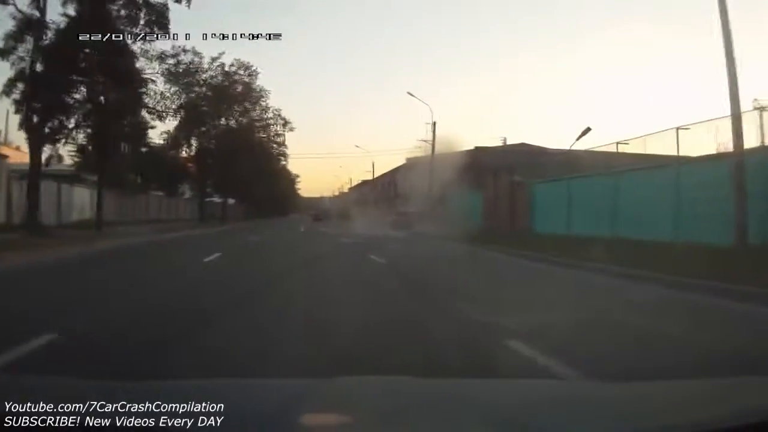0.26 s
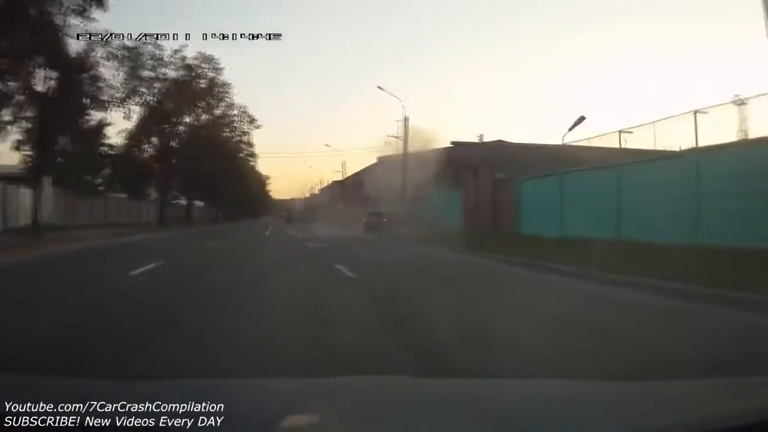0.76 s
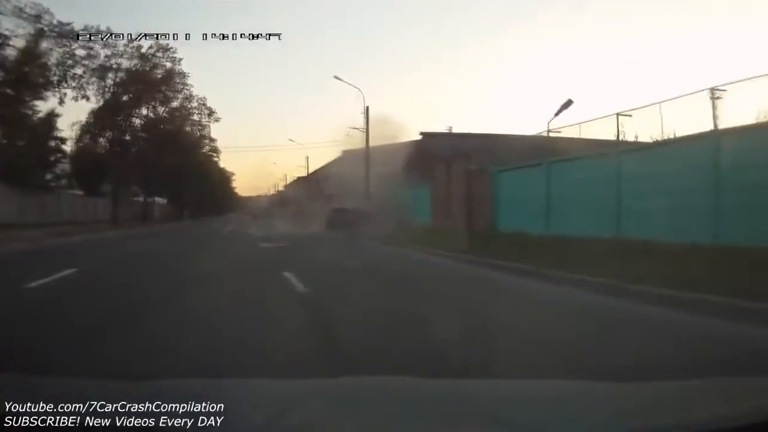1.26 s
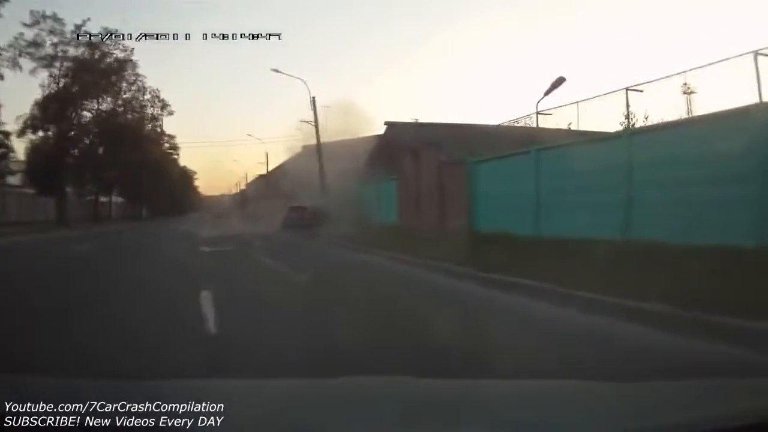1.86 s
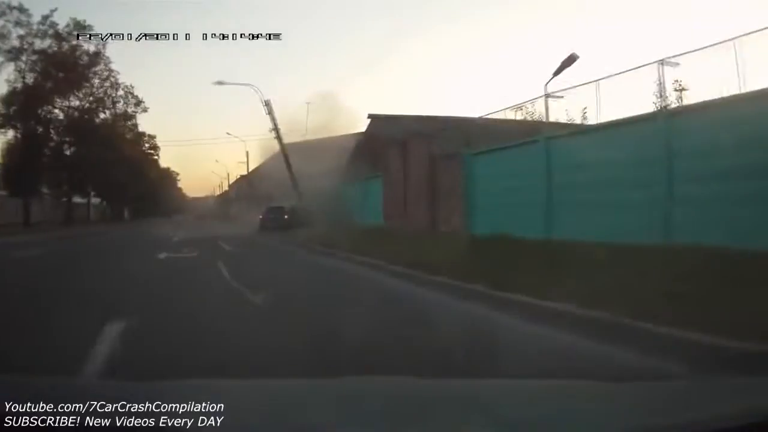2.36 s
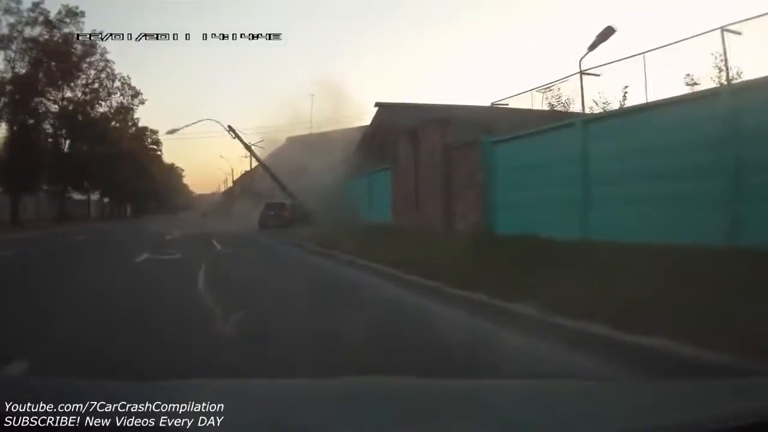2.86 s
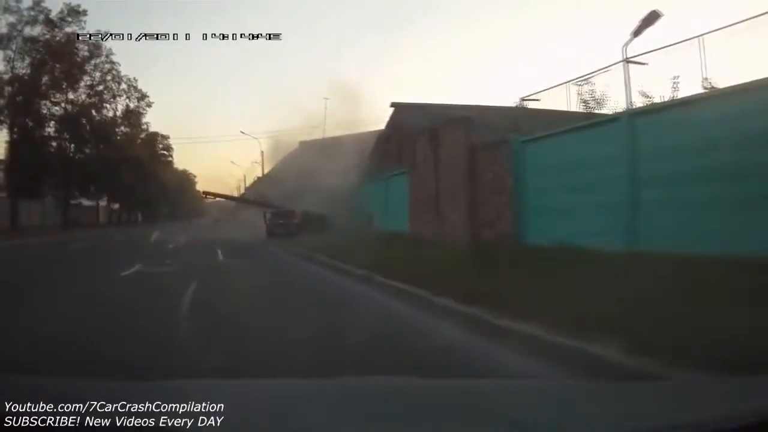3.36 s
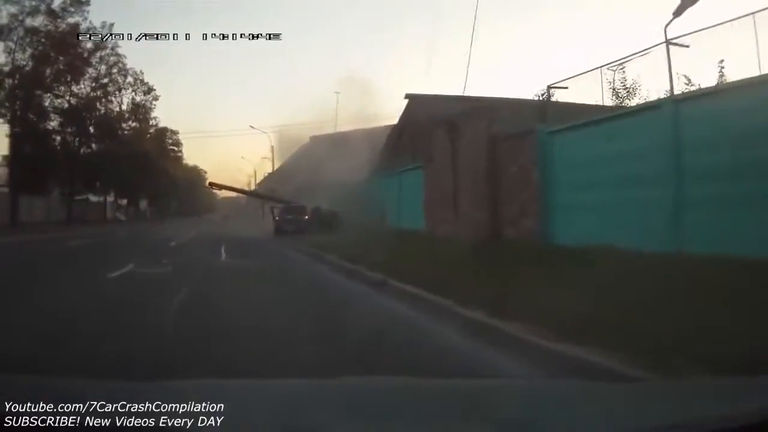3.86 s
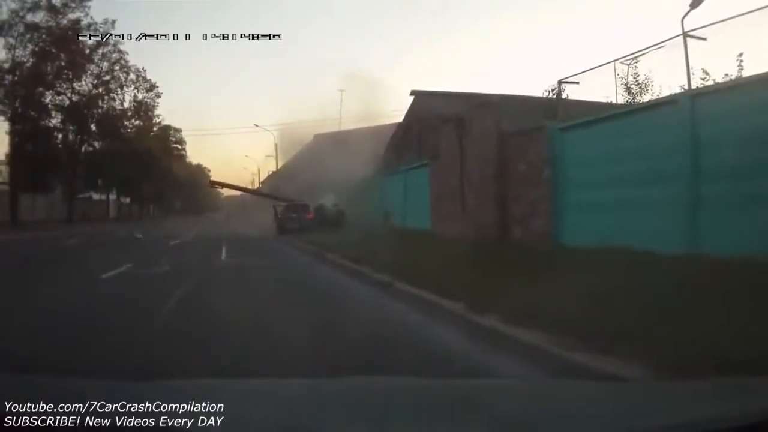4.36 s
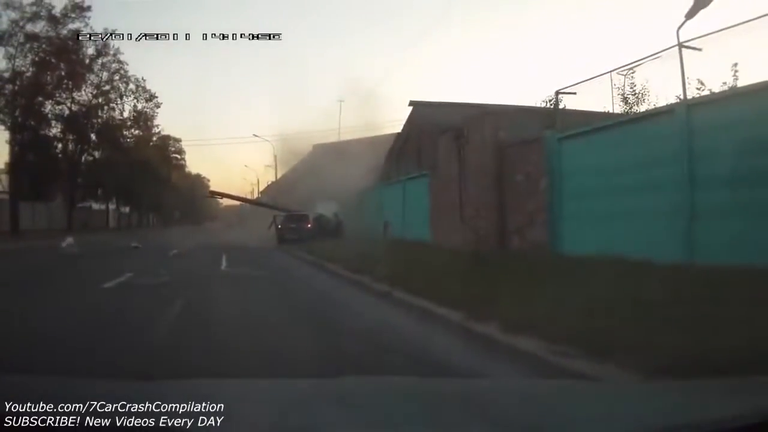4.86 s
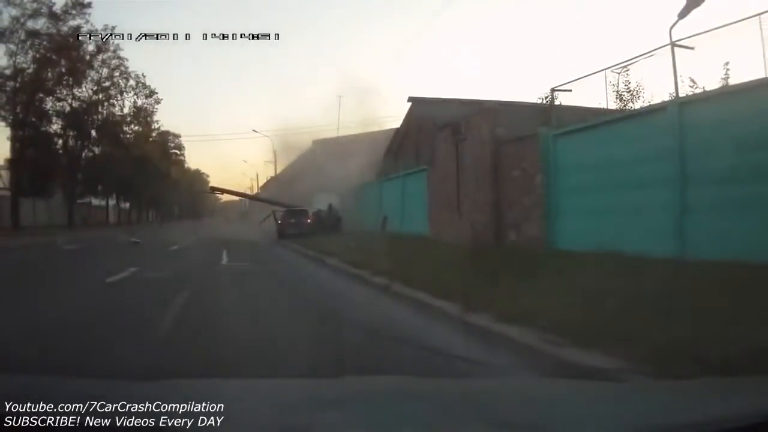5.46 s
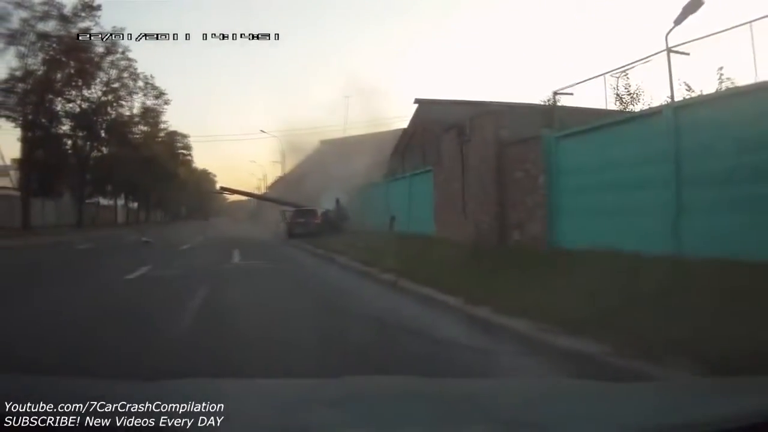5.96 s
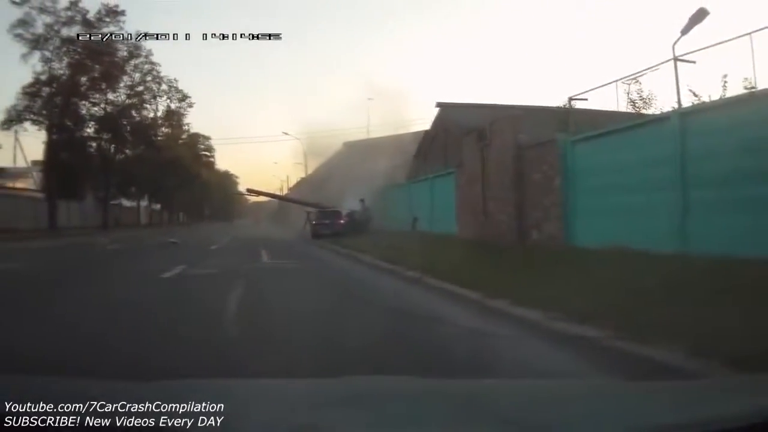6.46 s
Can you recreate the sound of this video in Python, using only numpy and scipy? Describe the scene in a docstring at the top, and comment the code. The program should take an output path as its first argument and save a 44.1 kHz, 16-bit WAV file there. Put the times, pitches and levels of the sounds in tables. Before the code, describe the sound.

A turn signal clicks evenly over the muffled rumble of tyres and a blowing fan, heard from within a car. After one early jolt the car slows, and loose objects rustle, crunch and thump against the trim and dashboard, the hardest hits crackling with dry clicks. Near the end the engine rises in a deep drone, with a faint swish, while the signal keeps clicking.

```python
"""Inside a car on a town road, heard by a small camera on the windscreen. From the start the road
rumbles through the body, the fan blows and the flasher relay clicks. The car slows, jolted near 1 s.
From 3.5 s, as it brakes to a crawl, loose things slide, scrape and knock in the cabin; the loudest knocks
overload the camera with dry clicks. At 5 s the engine picks up, its firings booming in the cabin air;
a soft swish follows and the driver eases off at 6.2 s."""
import sys
import numpy as np
from scipy import signal
from scipy.fft import rfft, irfft
from scipy.io import wavfile

SR = 44100
rng = np.random.default_rng(int(sys.argv[2]) if len(sys.argv) > 2 else 0)


def dump(signal):
    """Clip the signal to [-1, 1] and save it as 16-bit WAV at the path in sys.argv[1]."""
    limited = np.clip(np.atleast_2d(signal).T, -1, 1)
    pcm = np.round(limited * 32767).astype(np.int16)
    wavfile.write(sys.argv[1], SR, pcm)


N = 295470
TIME = np.arange(N) / SR


def undb(db):
    """Decibels to gain."""
    return 10 ** (np.asarray(db) / 20)


def unit(x):
    """Scale to rms 1."""
    return x / np.sqrt(np.mean(x ** 2))


def curve(table):
    """A (t/s, value) table interpolated over the scene."""
    return np.interp(TIME, *np.transpose(table))


def colour(x, outline):
    """Filter by an (f/Hz, level/dB) outline, falling 60 dB/octave beyond its ends; rms 1."""
    hz, db = np.transpose(outline)
    octave = np.log2(np.maximum(np.fft.rfftfreq(len(x), 1 / SR), 1))
    knots = np.log2(hz)
    beyond = np.abs(octave - np.clip(octave, knots[0], knots[-1]))
    gain = undb(np.interp(octave, knots, db) - 60 * beyond)
    return unit(irfft(rfft(x) * gain, len(x)))


def noise(outline, samples=N):
    """Coloured noise, rms 1."""
    return colour(rng.standard_normal(samples), outline)


def walk(rate_hz):
    """Random drift, spread near 1."""
    knots = rng.standard_normal(1024)
    return 1.2 * np.interp(TIME * rate_hz, np.arange(len(knots)), knots)


def strike(t, rise_s, t60_s):
    """Linear rise from t = 0, then exponential decay."""
    return np.clip(t / rise_s, 0, 1) * np.exp(-np.log(1000) * np.maximum(t - rise_s, 0) / t60_s)


def add(out, at_s, sound):
    """Mix a sound in at a given time."""
    start = max(int(at_s * SR), 0)
    out[start:start + len(sound)] += sound[:max(N - start, 0)]


# car speed: t/s, speed/(m/s)
SPEED = [(0, 15.8), (2.2, 10), (3.4, 8.1), (3.9, 3), (4.45, 4), (5.2, 4.1), (6.7, 4.4)]
# suspension rumble from bumps and the braking lurch: t/s, level/dB, t60/s
BUMPS = [(.66, -18.5, 4.4), (1.7, -17, 7.2), (3.06, -23.5, 1.7), (3.55, -20, 0.96), (4.0, -20, 0.46),
         (4.585, -16, 0.78)]
# spectra of wheel rumble, panel drone and tyre throb: f/Hz, level/dB
WHEEL_COLOUR = [(17, -9), (22, -1), (26, 10), (31, 0.5), (40, 1), (50, 0.5), (61, -7.5), (70, -7), (80, -7),
                (95, -8.5), (115, -25)]
BODY_COLOUR = [(65, -19.5), (110, -3.5), (135, -0.5), (156, -10), (183, -5), (238, -3), (267, -4.5),
               (312, -14), (355, -9.5), (404, -16), (435, -16), (480, -27), (620, -43.5), (1060, -120)]
TYRE_COLOUR = [(52, -11), (61, -1), (70, -2), (80, -2.5), (92, -9)]


def road(cruise_m_s=13):
    """Uneven asphalt shakes wheels, panels and tyres, more with speed; bumps add swells of rumble."""
    doublings = np.log2(curve(SPEED) / cruise_m_s)
    rolling_power = undb(-23 + 5 * doublings) ** 2
    bump_power = sum((undb(db) * strike(TIME - s, 0.063, t60_s)) ** 2 for s, db, t60_s in BUMPS)
    wheels = noise(WHEEL_COLOUR) * np.sqrt(rolling_power + bump_power) * undb(walk(9))
    body = noise(BODY_COLOUR) * undb(-29.5 + 1.68 * doublings + 0.68 * walk(16))
    tyres = noise(TYRE_COLOUR) * undb(-28 + 8.5 * doublings + 2 * walk(7))
    return wheels + body + tyres


# engine firing rate: t/s, f/Hz
FIRING_RATE = [(5.05, 19.2), (5.3, 34), (5.42, 35.5), (5.52, 41.2), (5.72, 44.6), (6.03, 44.7), (6.2, 50),
               (6.42, 46.4), (6.7, 48)]


def engine(pickup_s=5.02, ease_s=6.2, ease_db_per_s=-2.5, cabin_hz=41, width_hz=5.3):
    """Slightly uneven firings boom, most at the cabin's resonance; clatter grows with the revs."""
    hz = curve(FIRING_RATE)
    phase = 2 * np.pi * np.cumsum(hz * (1 + 0.0084 * walk(20))) / SR
    orders = np.sin(phase) + undb(-15.5) * np.sin(2 * phase) + undb(-25.5) * np.sin(3 * phase)
    throttle = np.clip((TIME - pickup_s) / 0.19, 0, 1)
    resonance_db = 6 / (1 + (2 * (hz - cabin_hz) / width_hz) ** 2)
    ease_db = ease_db_per_s * np.maximum(TIME - ease_s, 0)
    boom = unit(orders) * undb(-26 + resonance_db + ease_db + walk(18))
    clatter = undb(-36) * noise(BODY_COLOUR) + undb(-51) * noise(VENT_COLOUR)
    return throttle * (boom + clatter * hz / cabin_hz)


# cabin knocks: t/s, level/dB, hardness/dB, body t60/s, thud/dB, mode tilt/(dB/octave)
KNOCKS = [(1.061, -12, -15.5, 0.086, -23, 0), (3.589, -26, -2.5, 0.32, -14, 9.5),
          (3.655, -34.5, 1.5, 0.13, -12, -1), (4.243, -14.5, -23, 0.059, 3.5, 8),
          (4.436, -28, -10, 0.26, 9.5, 6), (4.553, -24, -15.5, 0.23, -4, 3.5),
          (4.632, -17, -9.5, 0.086, -20, 1), (4.641, -12.5, -13, 0.1, -30, 7),
          (4.664, -16.5, -11, 0.12, -9, -6), (4.713, -12.5, -14, 0.1, -3.5, 2),
          (4.744, -17.5, -16.5, 0.26, -9, 3.5), (4.783, -22, -27, 0.31, -17, 8),
          (4.85, -20, -25, 0.11, -19, -7), (4.882, -26.5, -3.5, 0.16, -10, 0),
          (5.097, -23, -14, 0.1, -9, -4)]
# body modes and dashboard clatter spectrum: f/Hz, level/dB
BODY_MODES = [(112, -6.5), (131, -2.5), (192, 5.5), (222, 4.5), (255, 2), (303, -2.5), (352, -9),
              (398, -16)]
DASH_COLOUR = [(300, 12.5), (400, 2), (550, 0), (670, -7), (760, -10), (930, -7.5), (1100, -12),
               (1300, -20.5), (1600, -32), (2400, -42), (4000, -49.5), (8000, -45.5)]


def knocks(thud_hz=120):
    """Knocks ring the body's modes; hard ones clatter in the dashboard, heavy ones thud in the floor."""
    out, t = np.zeros(N), TIME[:SR]
    hz, db = np.transpose(BODY_MODES)
    for s, level_db, hard_db, t60_s, thud_db, tilt_db in KNOCKS:
        detuned_hz = hz * (1 + 0.028 * rng.standard_normal(len(hz)))
        gains = undb(db + tilt_db * np.log2(hz / hz[0]))
        body = unit(gains @ np.sin(2 * np.pi * np.outer(detuned_hz, t)))
        dash = undb(hard_db - 0.5) * noise(DASH_COLOUR, len(t)) * strike(t, 0.002, 1.5 * t60_s)
        thud = undb(thud_db) * np.sin(2 * np.pi * thud_hz * t)
        add(out, s, undb(level_db) * ((body + thud) * strike(t, 0.0042, t60_s) + dash))
    return out


# armature bounces after contact: t/s, frame clack/dB, spring snap/dB
BOUNCES = [(.0008, -4, -4), (.0029, -8, -2), (.006, -9, -9.5), (.0092, -9, -10.5)]
# contact crack spectrum: f/Hz, level/dB
CRACK_COLOUR = [(1400, 13), (3500, 4), (7500, -10), (9800, 0), (11500, -14), (14500, -11)]


def relay_click(modes, frame_top_hz=4200):
    """The armature bounces on its stop; each touch clacks the frame and snaps the metal spring."""
    t = TIME[:SR // 8]
    hz, db = np.transpose(modes)
    detune, spread_db = rng.standard_normal((2, len(hz)))
    phase = 2 * np.pi * (np.outer(hz * (1 + 0.00044 * detune), t) + rng.random((len(hz), 1)))
    partials = undb(db + spread_db)[:, None] * np.sin(phase)
    partials /= np.std(partials.sum(axis=0))
    frame = partials[hz < frame_top_hz].sum(axis=0)
    spring = partials[hz >= frame_top_hz].sum(axis=0)
    clack = sum(undb(clack_db) * strike(t - s, 0.0005, 0.007) for s, clack_db, _ in BOUNCES)
    snap = sum(undb(snap_db) * strike(t - s, 0.0005, 0.008) for s, _, snap_db in BOUNCES)
    frame_fade = undb(-5.5) * strike(t, 0.005, 0.075)
    spring_fade = undb(-6.5) * strike(t, 0.004, 0.06)
    crack = undb(-12) * noise(CRACK_COLOUR, len(t)) * snap
    scattered = undb(-6) * noise(modes, len(t)) * frame_fade  # off seats and trim
    return frame * (clack + frame_fade) + spring * (snap + spring_fade) + crack + scattered


# relay modes, pulled in and released: f/Hz, level/dB
TOCK_MODES = [(520, 8), (970, -0.5), (1150, 1), (1510.0, 0), (1820.0, -9), (2050.0, -13), (2680.0, -17),
              (3030.0, -12), (3290.0, -8), (3510.0, -5.5), (3810.0, -9), (4520.0, -10.5), (5040.0, -2.5),
              (5690.0, -13.5), (6250.0, -13), (6790.0, -13), (7130.0, -21.5), (7640.0, -11.5),
              (8990.0, -21.5), (9640.0, -28.5)]
TICK_MODES = [(900, -3), (1220, -1), (1520.0, -6), (1790.0, -11), (2030.0, -13.5), (2290.0, -10.5),
              (2680.0, -9.5), (3000.0, -7.5), (3280.0, -3.5), (3430, -5.5), (3600.0, -5.5), (3850.0, -2),
              (4300.0, -15.5), (4930.0, -10), (5630.0, -14), (5860.0, -17), (6140.0, -16.5), (6850.0, -12),
              (7110.0, -16), (7580.0, -13), (8950.0, -20)]


def flasher(first_s=0.0064, period_s=0.67059, lamp_on_s=0.3144):
    """The relay pulls in (tock) once a period and lets go (tick) after the lamp's on time."""
    out = np.zeros(N)
    for s in np.arange(first_s, N / SR, period_s):
        add(out, s, undb(-37.5) * relay_click(TOCK_MODES))
        add(out, s + lamp_on_s, undb(-41) * relay_click(TICK_MODES))
    return out


# blows on the dashboard: t/s, level/dB, t60/s
CLACKS = [(4.634, -34, .06), (4.646, -28, .06), (4.884, -33, 0.084)]
# dashboard panel modes: f/Hz, level/dB
PANEL_MODES = [(470, 0), (580, 0), (690, -0.5), (800, 3), (950, 4.5), (1090, -4), (1260, -14)]


def clacks():
    """Hard things strike the dashboard and ring its panel, a little differently each time."""
    out, t = np.zeros(N), TIME[:SR // 2]
    hz, db = np.transpose(PANEL_MODES)
    for s, level_db, t60_s in CLACKS:
        detuned_hz = hz * (1 + 0.033 * rng.standard_normal(len(hz)))
        phase = 2 * np.pi * (np.outer(detuned_hz, t) + rng.random((len(hz), 1)))
        panel = unit(undb(db) @ np.sin(phase))
        add(out, s, undb(level_db) * panel * strike(t, 0.0014, t60_s))
    return out


# overload clicks: t/s, level/dB
OVERLOAD_CLICKS = [(1.0668, -40.5), (4.632, -47), (4.647, -49), (4.67, -46), (4.717, -39)]
# overload click spectrum: f/Hz, level/dB
OVERLOAD_COLOUR = [(700, 6), (1500, 5), (2200, -10), (3000, -24), (4000, -16), (5000, -25), (8000, -33)]


def overload_clicks():
    """The camera's sound distorts with brief dry clicks, placed at the peaks of the loudest knocks."""
    envelope = sum(undb(db) * strike(TIME - s, 0.00077, 0.0051) for s, db in OVERLOAD_CLICKS)
    return noise(OVERLOAD_COLOUR) * envelope


# modes of loose parts: f/Hz, level/dB
RATTLE_MODES = [(3100, -0.5), (3290, -6), (3445, 0.5), (3620, -1)]


def rattle(catches_per_s=240, wander_hz=35, t60_s=0.03):
    """Random catches each ring one mode of the loose parts, which shift as they move; rms 1."""
    out = np.zeros(N)
    fade = np.exp(-np.log(1000) * TIME[:SR // 4] / t60_s)
    for hz, db in RATTLE_MODES:
        catches = (rng.random(N) < catches_per_s / SR) * undb(rng.standard_normal(N))
        phasor = np.exp(2j * np.pi * np.cumsum(hz + wander_hz * walk(25)) / SR)
        out += undb(db) * np.imag(phasor * signal.fftconvolve(catches / phasor, fade)[:N])
    return unit(out)


def slide_power(t, rise_s, t60_s, creep_s=0.034):
    """Friction power of one slide: it creeps, breaks loose at t = 0, then settles."""
    creep = undb(-8.5) * strike(t + creep_s, creep_s, t60_s)
    settle = undb(-11) * strike(t, rise_s, t60_s=1.8)
    return creep ** 2 + strike(t, rise_s, t60_s) ** 2 + settle ** 2


# things sliding: t/s, level/dB, t60/s, hollow body/dB, grit/dB
SLIDES = [(.46, -69, 0.55, 5, -10), (.739, -63.5, 0.15, 21, -2), (2.17, -70.5, 1.2, 0, -7),
          (3.53, -59, 0.45, -1, -12), (3.587, -49, 0.33, 9.5, -8), (3.654, -50.5, 0.42, 11, -8),
          (4.236, -58, 0.68, -11, -25), (4.472, -48, 0.51, 10, -9), (4.58, -59, 1.4, 7, -5),
          (4.69, -49, 0.23, 4, -5), (4.93, -61, 0.91, 12.5, -20), (5.045, -60, 0.79, 4.5, -21),
          (5.279, -57, 0.3, 13.5, -22)]
# loose things tapping the trim: t/s, level/dB
TAPS = [(.804, -57), (1.065, -70), (3.196, -63), (3.398, -57), (3.594, -55), (3.675, -53), (4.3, -57),
        (4.431, -56), (4.885, -57), (6.435, -59)]
# spectra of rustle, hollow trim and hard-pressed grains: f/Hz, level/dB
RUSTLE_COLOUR = [(1500, -5), (2100, -4.5), (2700, -3), (3150, 2), (3600, 3.5), (3950, -5.5), (4600, -7.5),
                 (6000, -8), (6700, -12.5), (7800, -19.5), (9000, -24), (13000, -56.5)]
HOLLOW_COLOUR = [(200, -6), (340, 10.5), (550, -9), (750, -8), (950, 9.5), (1100, -2), (1270, 5),
                 (1420, -15.5), (1600, -14), (1900, -43)]
GRIT_COLOUR = [(1800, -8), (3000, -6), (4000, -4), (5000, 0.5), (6100, 1), (6800, -12.5), (8000, -24.5)]


def slides(rise_s=0.011):
    """Friction grains rustle, crunch and rattle on the hollow trim; taps are brief bursts of rustle."""
    grains = rng.standard_normal(N) * undb(2.5 * walk(150))
    rustle_power = sum((undb(db) * strike(TIME - s, 0.0022, 0.066)) ** 2 for s, db in TAPS)
    hollow_power, grit_power = np.zeros(N), np.zeros(N)
    for s, db, t60_s, hollow_db, grit_db in SLIDES:
        power = undb(db) ** 2 * slide_power(TIME - s, rise_s, t60_s)
        rustle_power += power
        hollow_power += power * undb(hollow_db) ** 2
        grit_power += (undb(db + grit_db) * strike(TIME - s, rise_s, t60_s)) ** 2
    rustle = unit(colour(grains, RUSTLE_COLOUR) + undb(-1.5) * rattle())
    hollow = colour(grains, HOLLOW_COLOUR)
    grit = unit(noise(GRIT_COLOUR) * undb(3 * walk(150)))
    return rustle * np.sqrt(rustle_power) + hollow * np.sqrt(hollow_power) + grit * np.sqrt(grit_power)


def stick_slip(runs, outline, jerks_per_s, t60_s):
    """Runs of uneven jerks, each a tiny noise burst."""
    out, t = np.zeros(N), TIME[:SR // 16]
    for s, length_s, level_db in runs:
        gaps_s = rng.uniform(0.5, 1.5, 32) / jerks_per_s
        sizes_db = rng.standard_normal(32)
        for after_s, size_db in zip(np.cumsum(gaps_s) - gaps_s[0], sizes_db):
            burst = noise(outline, len(t)) * strike(t, 0.001, t60_s)
            if after_s < length_s:
                add(out, s + after_s, undb(level_db + size_db) * burst)
    return out


# runs of hollow blows: t/s, length/s, level/dB
CRUNCHES = [(3.59, .045, -34.5), (3.638, .058, -38)]
# blow spectrum: f/Hz, level/dB
BLOW_COLOUR = [(450, 3), (700, -6), (820, 0), (960, 6), (1090, -4), (1270, -3), (1400, -14), (1600, -23),
               (1900, -36), (2800, -31), (3450, -15), (4200, -24), (6000, -28), (8000, -46)]


def crunches():
    """Small hollow blows merge into a broad crunch."""
    return stick_slip(CRUNCHES, BLOW_COLOUR, jerks_per_s=130, t60_s=0.025)


# scrapes on the trim: t/s, length/s, level/dB
SCRAPES = [(4.399, .045, -59), (5.278, .085, -55.5)]
# scrape spectrum: f/Hz, level/dB
SCRAPE_COLOUR = [(2600, -26), (3050, -6), (3250, -7), (3450, 3), (3750, -4), (4100, -20), (6000, -18),
                 (8000, -27)]


def scrapes():
    """Short, bright, gritty scrapes jerk along the trim."""
    return stick_slip(SCRAPES, SCRAPE_COLOUR, jerks_per_s=170, t60_s=0.018)


# air vent spectrum: f/Hz, level/dB
VENT_COLOUR = [(280, -28), (470, -1), (570, -3.5), (616, -4.5), (697, -4.5), (743, -10), (963, -7),
               (1320, -18), (1420, -21), (1650, -29), (1750, -31), (2200, -35.5), (2860, -75), (4840, -120)]


def fan():
    """Ventilation air rushes on at any speed."""
    return noise(VENT_COLOUR) * undb(-44.5 + 0.5 * walk(17))


# hiss spectrum and electrical whine tones: f/Hz, level/dB
HISS_COLOUR = [(1900, -13), (2300, -3.5), (2750, -4), (3000, -0.5), (3600, 0), (4000, -10), (4500, -10),
               (5400, -4), (6200, -7.5), (6900, -11), (7900, -8.5), (8400, -14.5), (10000, -19.5),
               (14000, -27)]
WHINE_TONES = [(7867, -81), (7897, -86), (7957, -91.5), (8017, -95)]


def hiss(swish_s=5.95):
    """Faint even hiss, a thin electrical whine and a soft high swish near the end."""
    air = noise(HISS_COLOUR) * undb(-67 + 0.5 * walk(1.7))
    whine = np.zeros(N)
    for hz, db in WHINE_TONES:
        phase = 2 * np.pi * np.cumsum(hz + 3 * walk(10)) / SR
        whine += undb(db) * unit(np.sin(phase))
    swish = noise([(3000, 7.5), (4200, -3), (5500, 1), (7500, -6), (11000, -20)])
    return air + whine + undb(-63.5) * swish * strike(TIME - swish_s, 0.19, 2.86)


def scene():
    """The whole cabin, mono."""
    car = road() + fan() + engine() + flasher()
    impacts = knocks() + clacks() + overload_clicks()
    friction = slides() + scrapes() + crunches()
    return (car + impacts + friction + hiss())[None, :]


def record(dry, top_hz=15000):
    """The camera rounds the loudest peaks and cuts the top."""
    rounded = np.tanh(0.58 * dry) / 0.62
    lowpass = signal.ellip(8, 0.2, 70, top_hz, fs=SR, output="sos")
    return signal.sosfilt(lowpass, rounded)


dry = scene()
out = record(dry)
dump(out)
```